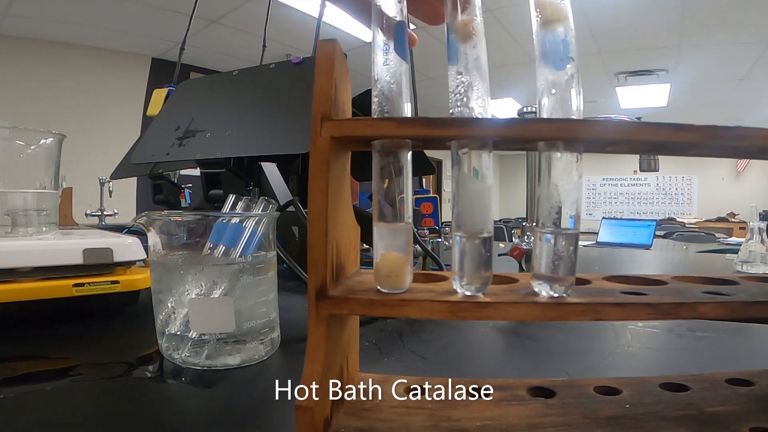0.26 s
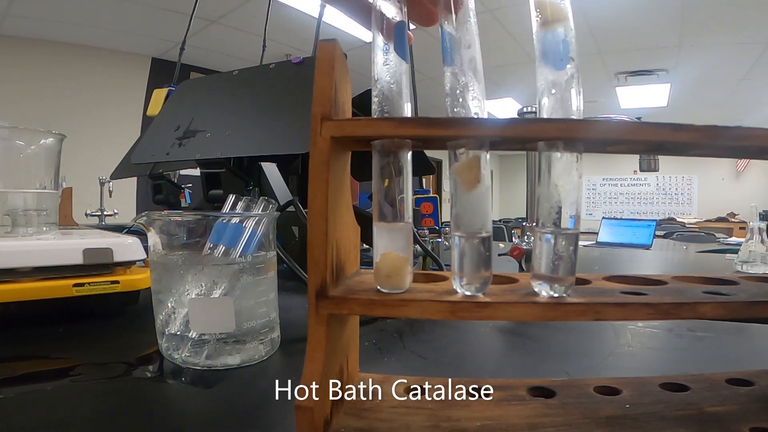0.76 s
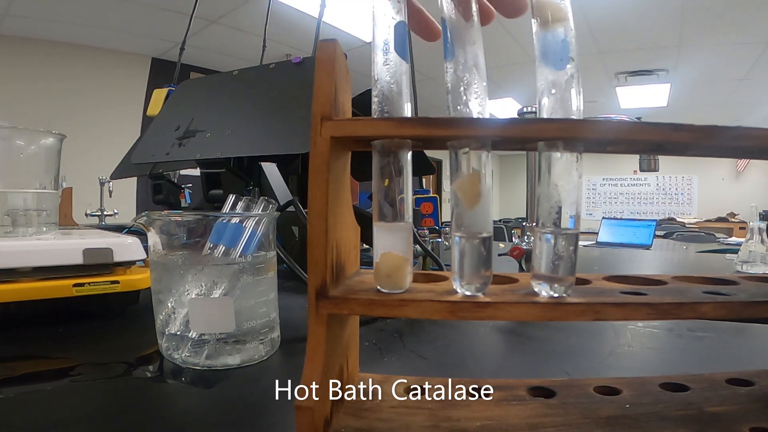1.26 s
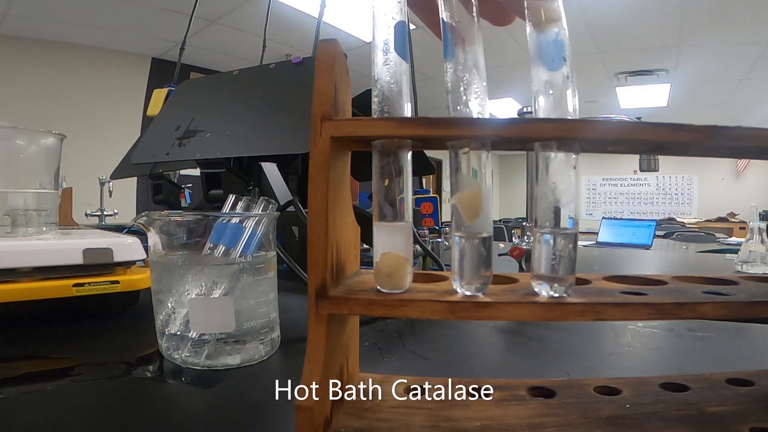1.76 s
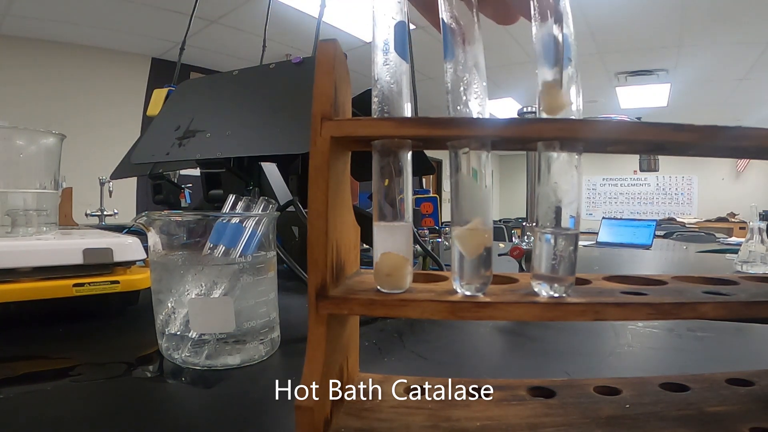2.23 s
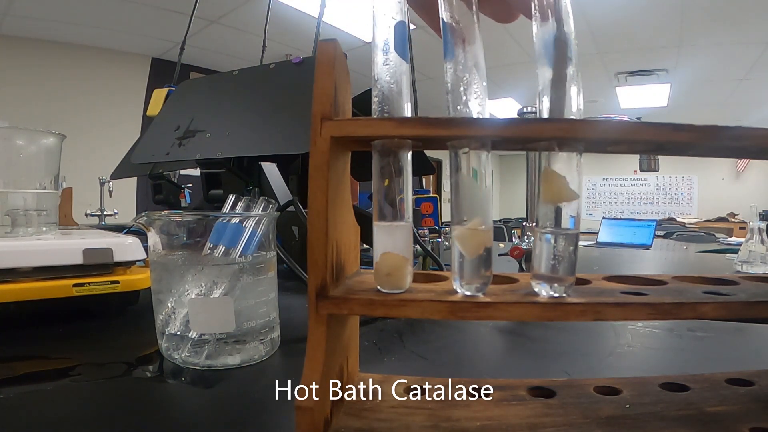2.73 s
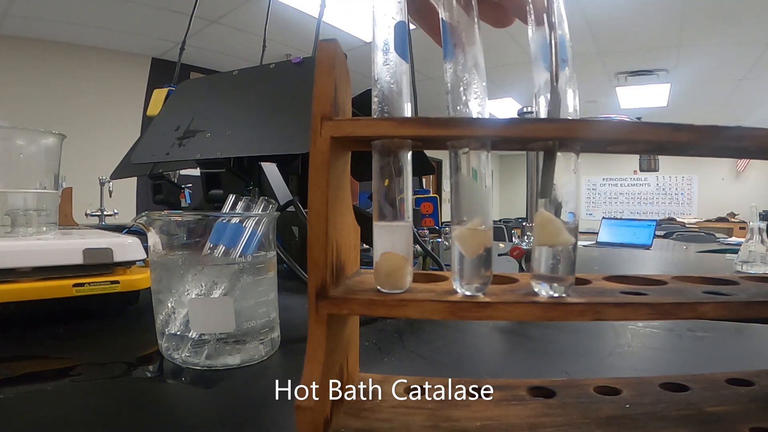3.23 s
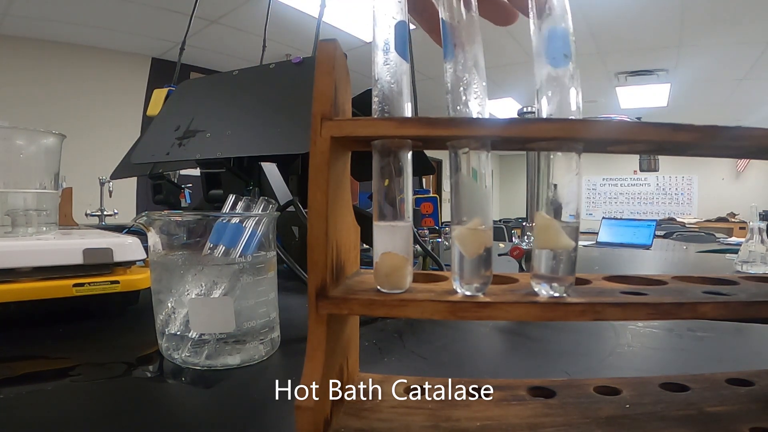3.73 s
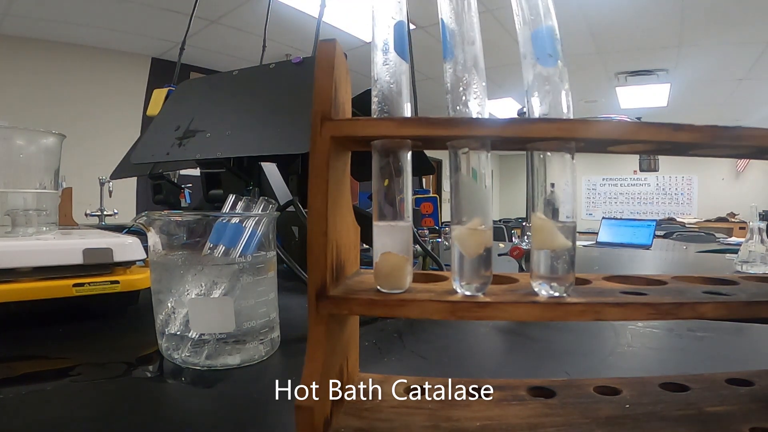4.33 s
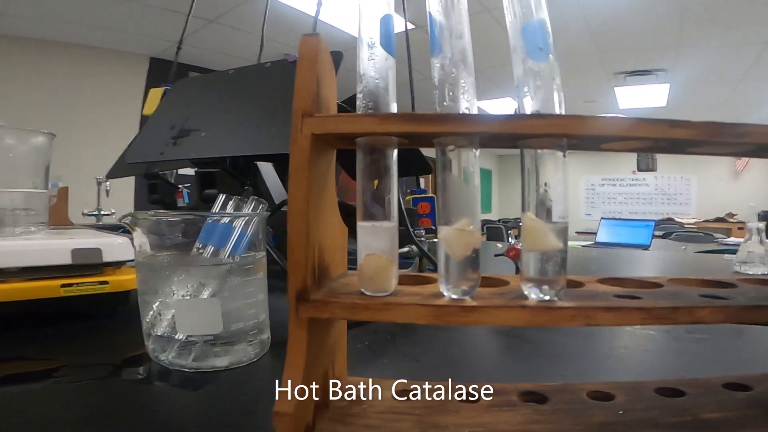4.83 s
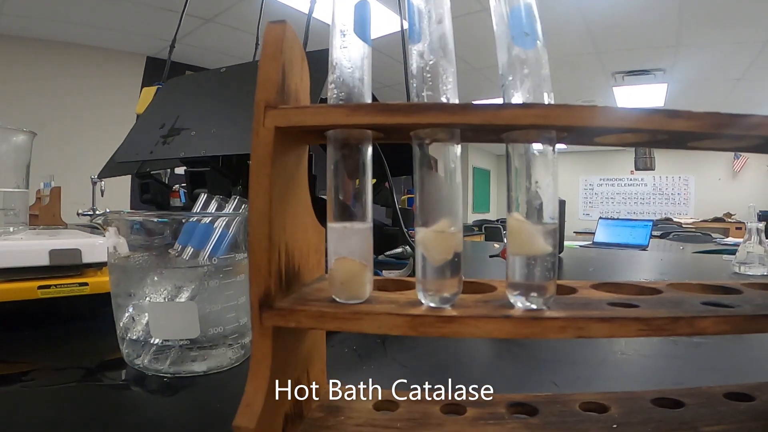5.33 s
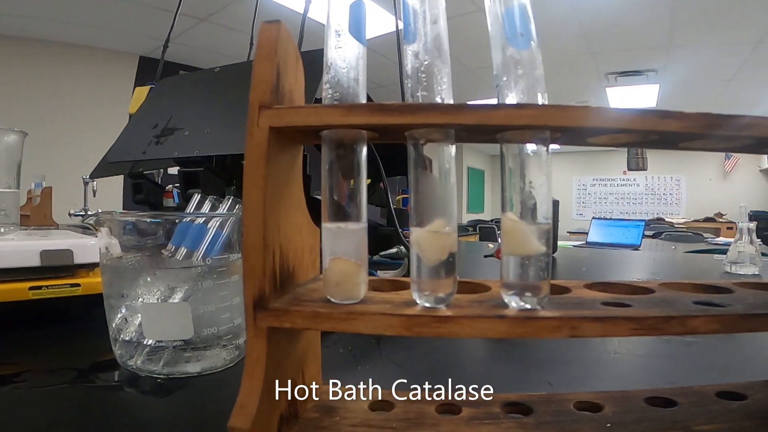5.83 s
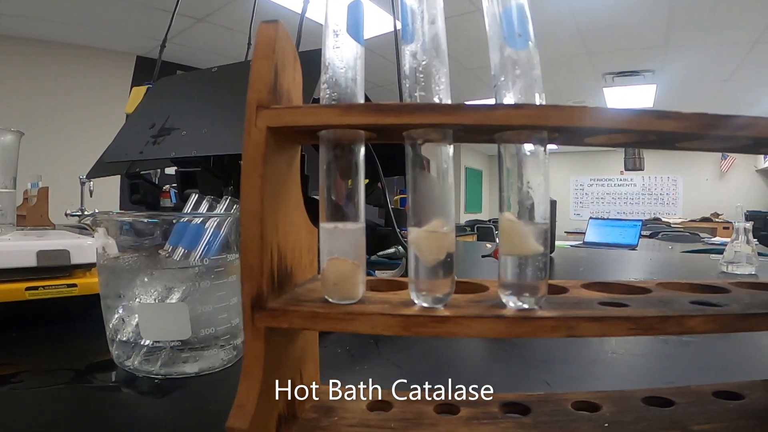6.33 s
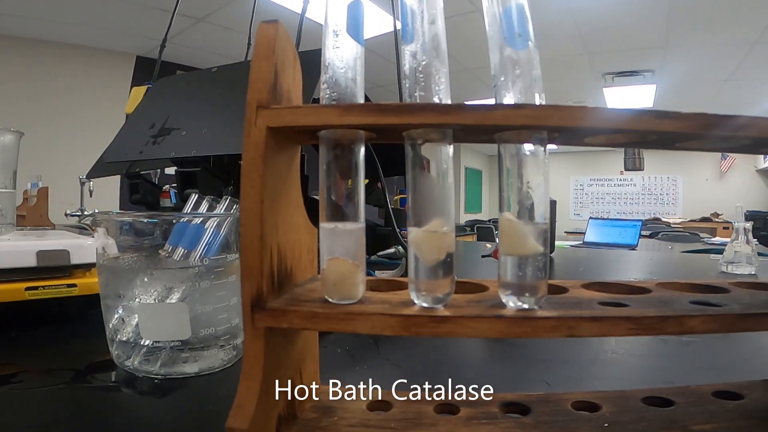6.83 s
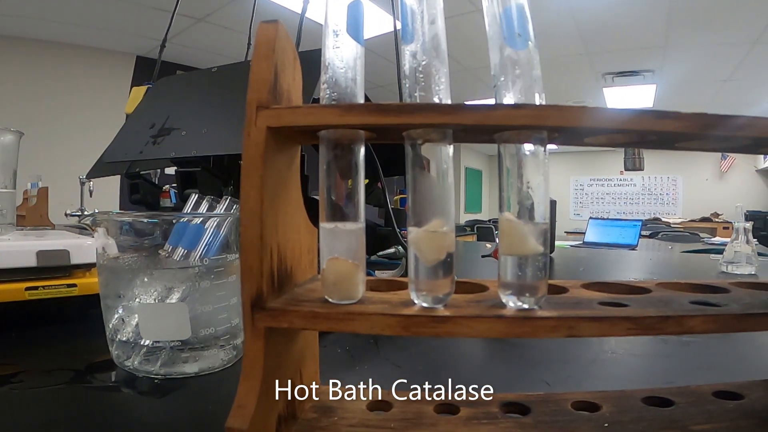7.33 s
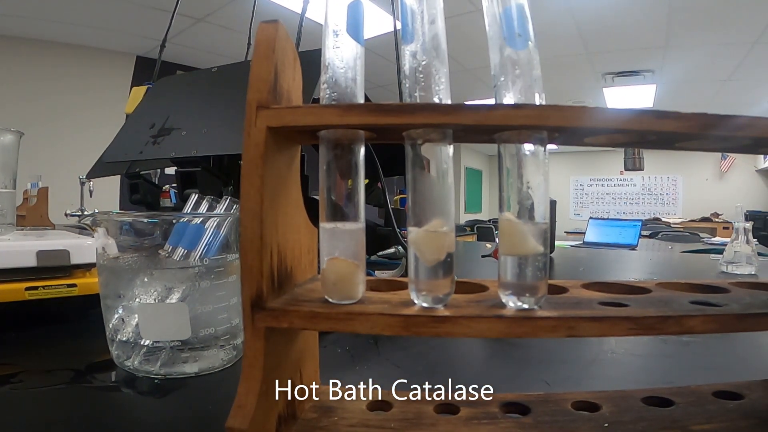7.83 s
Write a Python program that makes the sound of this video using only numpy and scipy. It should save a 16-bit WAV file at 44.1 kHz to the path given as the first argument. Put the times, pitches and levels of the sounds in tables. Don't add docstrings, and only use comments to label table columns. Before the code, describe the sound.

A rod taps and rubs glass test tubes, pushing soft lumps down in bursts of bright clinks, then the camera knocks and scrapes along the bench.

```python
import sys
import numpy as np
from scipy import signal
from scipy.fft import rfft, irfft
from scipy.io import wavfile

SR = 44100
rng = np.random.default_rng(int(sys.argv[2]) if len(sys.argv) > 2 else 0)


def nominal_scale(level):
    x = np.asarray(level, float) / 20
    return 10 ** x


def wav_record(signal):
    frames = np.transpose(np.atleast_2d(signal))
    bounded = np.clip(frames, -1, 1)
    quanta = np.round(bounded * 32767).astype(np.int16)
    wavfile.write(sys.argv[1], SR, quanta)


N = 356328

# pitch in Hz, level in dB.
WALL_MODES = [(1400, -16.5), (1700, -14.5), (2150, -9), (2330, -12.5), (2930, -12), (3360, -7.5),
              (3720, -5.5), (4150, -1.5), (4620, 2.5), (5400, 0.5), (6100, 3.5), (6700, 2.5), (7400, 8.5),
              (8500, 9.5), (9300, 8), (10300, 6.5), (12300, 5), (13400, -6), (14600, -22)]
GLASS_HZ = [5360, 5975, 6605, 8270, 8580, 9302, 9464, 10275, 11510, 11720, 12200, 12480, 13730, 14200]
# level in dB, time to fall by 60 dB in seconds.
GLASS_RING = [(-24, .15), (-7, .28), (-13, .3), (-4, .14), (-11, .2), (-6, .23), (-15, .2), (-9, .2),
              (-15, .18), (-13, .18), (-8, .11), (-14, .15), (-17, .15), (-13, .13)]
# peak time in seconds, swell in ms per 20 dB,
# fade in ms per 20 dB, rasp level in dB, brightness in dB.
SLIDE_STROKES = [(4.976, 30.5, 39, -33.5, 0.5), (5.0, 27, 24, -37, 3), (5.028, 19, 15, -36, -5),
                 (5.06, 42, 72, -40.5, 2), (5.13, 92, 94, -37.5, 1), (5.195, 101, 57, -41, -3),
                 (5.228, 42, 15, -44.5, -2), (5.7, 46, 54, -49.5, 4), (5.77, 98, 65, -63, 14),
                 (5.9, 150, 150, -66.5, 3), (6.045, 40, 45, -52.5, 8.5), (6.2, 113, 73, -59, 9),
                 (6.392, 13, 58, -47.5, 9), (6.455, 56.5, 127, -43, 4), (6.77, 61, 57, -52, 4),
                 (6.9, 176, 233, -66.5, 11)]
LET_GO_S = 5.6


def rms_one(x):
    return x / np.sqrt(np.mean(x ** 2) + 1e-20)


def in_time(rows):
    s, *columns = np.transpose(rows)
    return [np.interp(np.arange(N) / SR, s, c) for c in columns]


def at_hz(points, hz):
    curve_hz, value = np.transpose(points)
    return np.interp(np.log(hz), np.log(curve_hz), value)


def drift(rate):
    r = np.exp(-80 * np.pi * rate / SR)
    slow = signal.lfilter([1], [1, -2 * r, r * r], rng.standard_normal(N // 40 + 2002))[2000:]
    return np.interp(np.arange(N) / 40, np.arange(len(slow)), rms_one(slow))


def shaped(noise, gain_db):
    hz = np.fft.rfftfreq(noise.shape[-1], 1 / SR).clip(5)
    return irfft(rfft(noise) * nominal_scale(gain_db(hz)), noise.shape[-1])


def filtered(x, order, hz, kind="low"):
    return signal.sosfilt(signal.butter(order, hz, kind, fs=SR, output="sos"), x)


def modes(hz, db, t60, seconds):
    t = np.arange(int(seconds * SR))[:, None] / SR
    sines = np.sin(2 * np.pi * hz * t) * np.tanh(2 * hz * t)
    return (nominal_scale(db - 60 * t / t60) * sines).sum(axis=1)


def add(out, sound, s, peak_db):
    i = round(s * SR)
    out[i:i + len(sound)] += (nominal_scale(peak_db) * sound / np.abs(sound).max())[:N - i]


def slips(per_s, spread_db):
    size = nominal_scale(spread_db * np.minimum(rng.exponential(1, N), 5)) * rng.choice([-1, 1], N)
    return size * (rng.random(N) < per_s / SR)


def strokes(rows):
    t = np.arange(0, N / SR + .002, .001)[:, None]
    s, swell, fade, db, *columns = np.transpose(rows)
    away = 1000 * np.maximum((s - t) / swell, (t - s) / fade)
    power = nominal_scale(2 * (db - 20 * away ** 1.61)) + 1e-14
    total = power.sum(axis=1)
    led = [power @ c / total for c in columns]
    return in_time(np.transpose([t[:, 0], 10 * np.log10(total), *led]))


def air(gain_db):
    # pitch in Hz, likeness of left and right from 0 to 1.
    likeness = [(60, 1), (180, 1), (550, 0.89), (1000, 0.42), (2000, 0.36), (4200, 0.24), (7000, 0.17),
                (15000, 0.1)]
    # pitch in Hz, left minus right in dB.
    air_lean = [(60, 1), (240, 0), (950, 5), (3770, 7), (15000, -0.5)]

    def side_db(hz):
        alike = at_hz(likeness, hz)
        return gain_db(hz) + 10 * np.log10((1.01 - alike.clip(0, 1)) / (1 + alike))

    mid, side = rng.standard_normal((2, N))
    mid, side = shaped(mid, gain_db), shaped(side, side_db)
    left = shaped(mid + side, lambda hz: at_hz(air_lean, hz) / 2)
    right = shaped(mid - side, lambda hz: -at_hz(air_lean, hz) / 2)
    return np.array([np.roll(left, 2), right]) / mid.std()


def ventilation():
    # pitch in Hz, dB per Hz.
    hum = [(12, -33), (20, -4.5), (81, -4.5), (112, 2.5), (129, 3), (146, -5.5), (195, -4.5), (286, -8),
           (346, -10), (419, -18), (476, -14), (900, -36.5), (1170, -78)]
    # time in seconds, gain in dB.
    hum_gain = [(0, -0.5), (.8, 1), (1.2, -2), (1.45, 0.5), (2.2, 0.5), (3.0, 0.5), (3.42, -2.5), (3.68, 3),
                (4.1, 0.), (5.6, -1), (6.2, 1.5), (7.0, 0.5), (8.08, 1.5)]
    # pitch in Hz, width in Hz, level in dB.
    duct = [(59, 8.7, -68.5), (115.3, 27, -55.5), (206.6, 6.6, -53.5), (240.4, 8.2, -55), (488.6, 12, -69)]
    # pitch in Hz, dB per Hz.
    hiss = [(530, -58), (900, -9.5), (1190, -0.5), (1300, -4), (1600, -2), (2960, -11.5), (3480, -8.5),
            (4210, -19), (5020, -16), (6130, -23.5), (8330, -24), (15000, -57)]
    # time in seconds, gain in dB.
    hiss_gain = [(0, 2.5), (4.0, 3.5), (4.4, 5.5), (5.4, 0.5), (8.08, 2)]
    hum_db = -41.5 + in_time(hum_gain)[0] + 0.32 * drift(4.6)
    out = nominal_scale(hum_db) * air(lambda hz: at_hz(hum, hz))
    for hz, width, db in duct:
        out += nominal_scale(db) * air(lambda f: -20 * np.log10(1 + ((f - hz) / width * 2) ** 2))
    hiss_db = -65.5 + in_time(hiss_gain)[0] + .5 * drift(2.1)
    return out + nominal_scale(hiss_db) * air(lambda hz: at_hz(hiss, hz))


def whirr():
    # time in seconds, chirps per second.
    chirp_pace = [(0.0, 17), (8.08, 15)]
    turns = np.cumsum(in_time(chirp_pace)[0]) / SR + 0.088
    gate = np.maximum(np.cos(2 * np.pi * turns), 0) ** 2.7
    tone = shaped(rng.standard_normal(N), lambda hz: -20 * np.log10(1 + ((hz - 8050) / 150) ** 2))
    return nominal_scale(-81.5) * gate * rms_one(tone)


def taps():
    # start in seconds, peak
    # in dB, strongest ring in Hz, wood heard through the glass in dB, treble (hardness) in dB.
    near_taps = [(0.2195, -36.5, 2480, -18, 13), (0.2957, -11, 4530, -8, -5.5),
                 (0.385, -15.5, 4900, -9.5, -2.5), (0.4998, -39, 4500, -19, -18),
                 (0.5487, -26.5, 3450, 4, -10), (0.6453, -16.5, 4560, -12, 5), (0.6872, -20, 4600, -3, 7),
                 (0.7105, -30.5, 2900, 13, -1), (0.7336, -12, 2400, -4, -15), (0.7441, -7.5, 4800, -24, -4),
                 (0.7955, -21, 3550, 11, -3), (0.829, -29, 3830, -17, 4), (0.92, -22, 2900, 3, -2),
                 (0.9405, -29, 3940, -13, -2), (0.9633, -18, 3880, -30, -8), (0.9755, -20, 4330, -19.5, -5),
                 (0.987, -24.5, 4000, -24, -7), (0.992, -32, 3590, -16, -3), (1.003, -28, 3920, -18, -5),
                 (1.0266, -32.5, 3620, -26, 2), (1.5035, -48, 4200, -25, -7), (1.983, -44, 4200, -23, -8),
                 (2.0805, -32, 3730, -6, -17), (2.099, -15, 4420, -41, -7), (2.137, -24.5, 4440, -27, -17),
                 (2.1444, -30, 3080, -30, -10), (2.1657, -12.5, 4030, -21, -3)]
    next_taps = [(2.268, -11, 4420, -13, -15.5), (2.2928, -10, 4130, -22, -4), (2.386, -19, 3380, -3, -4.5),
                 (2.522, -39.5, 2870, 16, 2), (2.578, -40, 2800, 13, -9), (2.722, -44, 3000, -1, -11),
                 (2.749, -41, 4700, 11, -4), (2.77, -33, 3350, 4, -14), (2.795, -47, 4200, -10, 0),
                 (2.801, -39, 2960, -3, -3), (2.819, -47, 4730, -1, -5), (2.876, -42, 3330, -5, -3),
                 (2.899, -26.5, 4630, -15, 4), (2.9183, -32, 3000, -10.5, -10), (2.937, -33, 4600, -1, -16),
                 (2.9568, -13.5, 3340, -17, 1), (2.972, -23, 3420, -28, 3), (3.184, -14.5, 4640, -10, -7),
                 (3.199, -19.5, 4640, -21, -5), (3.2507, -11, 4520, -3.5, -16), (3.279, -24.5, 2900, -7, 0),
                 (3.321, -35.5, 1960, 21, 0), (3.551, -21, 3320, 1, -11), (3.5685, -15, 3080, 4, 3),
                 (3.8417, -19.5, 4130, -3, -4), (3.727, -49, 2900, 3, -7), (3.744, -39, 2880, -2, -3),
                 (3.7512, -31, 2920, 6, -6), (3.8716, -16, 4930, -19, 4), (3.922, -30.5, 1470, 10.5, -4),
                 (3.932, -27, 3580, 9, -5), (3.943, -22, 3520, -12, -6), (3.979, -14, 4130, -26, 8)]
    settling_ticks = [(4.6107, -42, 1630, -3, -9), (4.6939, -24, 1580, 4, 12), (4.728, -46, 5030, -15, 2),
                      (4.815, -42, 1630, 9, -10), (5.6, -48, 1730, -4, 2), (6.504, -43, 4460, -10, -4),
                      (6.5201, -34, 2330, -3, 10), (6.5335, -40, 2300, 1, 8), (6.5927, -43, 2500, 13, -4),
                      (6.7363, -50, 1940, -7, 0), (6.775, -45, 2580, -21, 0), (7.794, -48, 7440, -27, 3),
                      (8.015, -40, 6800, -20, 8)]
    # start in seconds, peak in dB, pitch in Hz,
    # time to fall by 60 dB in seconds.
    lone_rings = [
        (3.8409, -22, 4130, 0.022),
        (3.978, -17, 3980, 0.061),
        (3.991, -26, 3965, 0.045),
        (4.6095, -37.5, 1580, 0.018),
        (4.728, -40, 5140, 0.018),
    ]
    wall_hz, wall_db = np.repeat(np.transpose(WALL_MODES), 3, axis=1)
    out = np.zeros(N)
    rows = near_taps + next_taps + settling_ticks
    bounce = np.zeros(130)
    bounce[[0, 58, 127]] = 1, .6, -.3
    for (s, db, hz, low_db, treble_db), luck in zip(rows, rng.standard_normal((len(rows), 3, len(wall_hz)))):
        softer_db = -15 - db
        high_db = -18 + treble_db - 0.061 * softer_db - 0.2 * max(low_db + 8.5, 0)
        pitch = wall_hz * (1 + .034 * luck[0])
        tilt_db = np.interp(pitch, [2400, 2900, 5460, 7930], [low_db + 4.5, 0, 0, high_db + 3])
        t60 = 0.048 * nominal_scale(0.089 * softer_db)
        damped = 0.23 * np.sqrt(t60) * (4000 / pitch) ** .5 * nominal_scale(2 * luck[2])
        ring = modes(pitch, wall_db + tilt_db + 4 * luck[1], damped, .12)
        ring += modes(pitch, wall_db + .6 * tilt_db + 13, .16 * damped, .12)
        ring += modes(hz * np.array([.994, 1.009]), 12, t60 * .85, .12)
        add(out, np.convolve(ring, bounce), s, db)
    for s, db, hz, t60 in lone_rings:
        add(out, modes(hz * np.array([.997, 1.006]), np.array([0, -6]), t60, .12), s, db)
    return filtered(out, 2, 1100, "high")


def rubs():
    # peak time in seconds, swell in ms
    # per 20 dB, fade in ms per 20 dB, peak in dB, singing pitch in Hz.
    rub_strokes = [(.226, 6, 32, -64, 2400), (.31, 7, 100, -61, 4500), (.395, 2, 39, -52.5, 5070),
                   (.558, 5, 53, -55, 2900), (.655, 13, 20, -51, 4200), (.76, 21, 22, -53, 4560),
                   (.805, 24, 17, -45.5, 3530), (.952, 3, 20, -51, 3800), (.98, 20, 26, -49.5, 4080),
                   (1.006, 18, 25, -56, 4000), (1.032, 26, 22, -55.5, 3420), (2.138, 13, 17, -49, 4420),
                   (2.31, 23, 88, -52, 3080), (2.44, 86, 129, -58, 3440), (2.57, 113, 56, -58.5, 2900),
                   (2.735, 33, 42, -57, 2900), (2.782, 39, 60, -47.5, 2090), (2.885, 26, 35, -53, 2230),
                   (2.932, 34, 46, -48, 4600), (2.975, 26, 24, -50.5, 3230), (3.2, 22, 41, -49, 4600),
                   (3.285, 24, 25.5, -43.5, 2980), (3.33, 26, 41, -55.5, 2010), (3.642, 39, 39, -53, 2900),
                   (3.755, 30, 49, -44, 2800), (3.787, 37, 20, -39.5, 4200), (3.86, 26, 38, -45.5, 2740),
                   (3.89, 30, 24, -44.5, 2760), (3.945, 27, 41, -39, 3650), (3.992, 27, 18, -44, 4100),
                   (4.42, 216, 145.5, -67, 1830), (4.705, 11, 37.5, -57.5, 1500),
                   (4.79, 76, 76, -62.5, 5800)]
    # pitch in Hz, width in Hz, level in dB.
    rubbed_tubes = [
        [(1880, 48, -9.5), (3590, 100, -12.5), (4130, 55, -12), (4950, 180, -13), (6130, 26, -19)],
        [(1730, 84, -4), (2045, 69, -1.5), (2980, 180, -5), (3330, 56, 1.5), (4200, 640, 5.5), (5680, 70, -2.5)],
    ]
    level_db, song_hz = strokes(rub_strokes)
    on_next = np.arange(N) > 2.25 * SR
    bright_db = np.where(on_next, -5.5, 7.5) + 0.88 * (level_db + 47.5)
    grains = nominal_scale(level_db + 2.8 * drift(60)) * rms_one(slips(per_s=4000., spread_db=3.2))
    place = np.digitize(drift(12), [-.43, .43]) + 3 * on_next
    wall_hz, wall_db = np.transpose([mode for mode in WALL_MODES if mode[0] > 6400])
    out = 0
    for k, luck in enumerate(rng.standard_normal((6, 2, len(wall_hz)))):
        hz, width, db = np.transpose(rubbed_tubes[k // 3])
        width = (1.5 * width).clip(130, 900)
        pitch = hz * (1 + .015 * luck[0, :len(hz)])
        low = modes(pitch, db + 10 * np.log10(width), np.log(1000) / np.pi / width, .06)
        wood_hz = np.geomspace(1000, 6200, 9) * (1 + 0.048 * luck[1, :1])
        low += modes(wood_hz, db.max() + 17.0, 0.003, .06)
        high = modes(wall_hz * (1 + .04 * luck[0]), wall_db + 3 * luck[1], .01, .06)
        for body, gain_db in ((low, 0), (high, bright_db - 4.5)):
            here = grains * (place == k) * nominal_scale(gain_db)
            out += signal.oaconvolve(here, body / np.linalg.norm(body))
    song_width_hz = 110
    turn = np.exp(2j * np.pi * np.cumsum(song_hz) / SR)
    song = filtered(grains / turn, 1, song_width_hz / 2) * turn
    return out[:N] + nominal_scale(-0.5) * np.sqrt(SR / song_width_hz) * song.real


def clinks():
    # start in seconds, peak in dB, favoured ring in Hz.
    touches = [(0.743, -20.5, 12480), (3.187, -22, 8270), (3.872, -34, 12480), (3.979, -29, 6605),
               (4.695, -38.5, 10275), (5.543, -54, 6605), (5.64, -59, 5975), (5.687, -53, 9302),
               (5.703, -46, 5975), (5.7005, -40, 14200), (5.702, -35.5, 12200), (5.703, -27, 8270),
               (5.706, -36, 9302), (5.719, -39, 8270), (5.728, -44, 10275), (5.8, -60, 12200),
               (5.876, -65, 5975), (5.951, -56, 5975), (6.024, -53, 6605), (6.044, -58, 5975),
               (6.371, -53, 6605), (6.386, -39, 10275), (6.387, -38, 8270), (6.389, -46.5, 5975),
               (6.393, -39, 6605), (6.411, -47, 8270), (6.43, -39, 6605), (6.431, -39, 10275),
               (6.448, -48, 11510), (6.447, -37.5, 5360), (6.459, -46, 5975), (6.455, -38, 10275),
               (6.457, -44, 8580), (6.488, -49, 6605), (6.518, -54, 8580), (6.546, -49, 8580)]
    out, hz, (mode_db, t60) = np.zeros(N), np.array(GLASS_HZ), np.transpose(GLASS_RING)
    for (s, db, favoured), luck in zip(touches, rng.standard_normal((len(touches), 1300))):
        distance = np.abs(hz - favoured)
        struck_db = np.where(distance == distance.min(), 3, mode_db - 5 + 3 * luck[:len(hz)])
        chatter = luck ** 3 * nominal_scale(-32 - 24 * np.arange(len(luck)) / len(luck))
        chatter[0] = 1
        lasts = t60 * (0.78 if s > LET_GO_S else .1)
        ring = modes(hz, struck_db, lasts, .4)
        ring += modes(hz + 45 * luck[-len(hz):], struck_db - 15, lasts, .4)
        add(out, signal.oaconvolve(ring, chatter), s, db)
    return out


def pops():
    # start in seconds, peak in dB, length of the push in seconds, upper modes in dB.
    jerks = [
        (1.4824, -17, 0.0035, 7.5),
        (1.8216, -23, 0.0034, -3),
        (1.962, -17, 0.0053, 1.5),
    ]
    # pitch in Hz, level in dB, time to fall by 60 dB in seconds.
    column = [(550, -9, 0.025), (1060, -33, 0.046), (1646, -7, 0.015), (2174, -12.5, 0.019),
              (2520, -17, 0.02), (3080, -24.5, 0.034), (3830, -12, 0.0076), (4200, -1, 0.0087),
              (4970, -1.5, 0.002), (5870, -21.5, 0.016), (9000, -30, 0.016), (9900, -21, 0.013),
              (12200, -39, 0.017)]
    out = np.zeros(N)
    hz, mode_db, t60 = np.transpose(column)
    t = np.arange(400) / SR
    for (s, db, push, upper_db), luck in zip(jerks, rng.standard_normal((len(jerks), 400))):
        drive = np.cos(2 * np.pi * np.outer(t, hz[2:4])).sum(axis=1) + 2.0 * luck
        drive = drive * (t < push) + 20.0 * (t == 0)
        body = modes(hz, mode_db + upper_db * (hz > 2800), t60, .1)
        add(out, np.convolve(body, drive), s, db)
    return out


def slides():
    # peak time in seconds, swell in ms per 20 dB,
    # fade in ms per 20 dB, rumble in dB.
    shakes = [
        (4.97, 37, 104, -26.5),
        (5.035, 30, 51, -25.5),
        (5.19, 295, 133, -36),
        (6.46, 91, 140, -39),
        (3.55, 36, 38, -43),
        (3.68, 80, 90, -45.5),
    ]
    # pitch in Hz, dB per Hz.
    rasp_colour = [(180, -31), (300, -21), (509, -18), (968, -2.5), (2250, -8), (2880, -14), (8560, -25),
                   (9290, -28), (12700, -39.5), (15500, -44)]
    # pitch in Hz, width in Hz, height in dB.
    bench = [(680, 110, 9), (1025, 160, 1.5), (1910, 150, 4.5), (2900, 300, 9), (3380, 170, 8),
             (4440, 220, 3.5), (5750, 290, 3.5), (9350, 250, -11)]

    def colour(hz):
        humps = sum(db / (1 + ((hz - top_hz) / width * 2) ** 2) for top_hz, width, db in bench)
        return at_hz(rasp_colour, hz) + humps

    rasp_db, bright_db = strokes(SLIDE_STROKES)
    rumble_db, = strokes(shakes)
    mid, side = (rms_one(shaped(slips(per_s=9000., spread_db=0.5), colour)) for _ in range(2))
    rasp = mid + .9 * side * [[1], [-1]]
    top = filtered(rasp, 2, 4500, "high")
    brightened = rasp + (nominal_scale(bright_db + 1.0 * drift(50)) - 1) * top
    rasp = nominal_scale(rasp_db - 1.5 + 1.2 * drift(70)) * brightened
    rumble = filtered(rng.standard_normal((2, N)), 1, [35, 90], "band")
    rumble = filtered(rumble, 2, 320)
    return rasp + nominal_scale(rumble_db + 4) * rms_one(rumble[0] + .55 * rumble[1] * [[1], [-1]])


def knocks():
    # start in seconds, peak in dB, ring in Hz.
    base_knocks = [(4.959, -37, 686), (4.975, -16.5, 1060), (5.006, -29, 970), (5.018, -29, 1910),
                   (5.026, -14, 705), (5.066, -35, 890), (5.09, -27, 2900), (5.121, -32, 1090),
                   (5.158, -37, 1200), (5.67, -37, 2150), (5.683, -38, 3400), (5.69, -43, 2100),
                   (6.023, -37.5, 2260), (6.042, -36, 3420), (6.387, -29, 3410), (6.404, -28.5, 2160),
                   (6.414, -28, 2340), (6.431, -22, 3350), (6.438, -19.5, 2240), (6.448, -22, 2210),
                   (6.456, -20.5, 2200), (6.469, -22.5, 826), (6.482, -29, 2260), (6.504, -36, 850),
                   (6.532, -31, 1670)]
    # pitch in Hz, level in dB.
    wood = [(650, 12.5), (850, 7.5), (1150, 6), (1550, -7), (1950, 12), (2250, -3), (2500, 10), (2900, -6),
            (3400, 6), (3800, -6), (4800, -19)]
    # start in seconds, peak in dB, pitch in Hz,
    # time to fall by 60 dB in seconds.
    thuds = [
        (4.976, -19.5, 193, .1),
        (5.034, -28, 900, 0.051),
        (5.042, -26, 746, 0.034),
        (6.512, -30.5, 328, 0.02),
    ]
    out, (wood_hz, wood_db) = np.zeros(N), np.transpose(wood)
    for (s, db, hz), luck in zip(base_knocks, rng.standard_normal((len(base_knocks), 2, len(wood)))):
        t60 = 0.043 * (1000 / hz) ** 0.25
        body = modes(wood_hz * (1 + 0.056 * luck[0]), wood_db + 4 * luck[1], 0.48 * t60, .1)
        add(out, body + modes(np.array([hz]), 10.5, t60, .1), s, db - 5.5)
    for s, db, hz, t60 in thuds:
        add(out, modes(np.array([hz]), 0, t60, .1), s, db)
    return out


def jingle():
    rasp_db, bright_db = strokes(SLIDE_STROKES)
    mode_db, t60 = np.transpose(GLASS_RING)
    i = np.arange(N)
    touches = slips(per_s=160.0, spread_db=5.5) * (i > LET_GO_S * SR) * (i < 6.62 * SR)
    ring = modes(np.array(GLASS_HZ), .5 * mode_db, .2 * t60, .2)
    shaken = nominal_scale(rasp_db - 21 + 0.34 * bright_db) * rms_one(touches)
    return signal.oaconvolve(shaken, ring / np.linalg.norm(ring))[:N]


def ports(x):
    # pitch in Hz, gain in dB.
    shade = [(8000, -1), (10000, -5), (12000, -10)]
    t = np.arange(1500) / SR
    scatter = np.diff(rng.standard_normal(1501)) * nominal_scale(-30 - 60 * t / .016)
    apart = signal.oaconvolve(x, scatter)[:N]
    left = shaped(signal.lfilter([0, 0, .6], [1, -.4], x), lambda hz: at_hz(shade, hz))
    return np.array([nominal_scale(3.3) * left + .6 * apart, nominal_scale(3.) * x - apart])


def room(x):
    t = np.arange(SR // 2) / SR
    noise = rng.standard_normal((2, 2, len(t))) * (t > .004)
    dull = signal.lfilter([.3], [1, -.8], noise[0])
    tail = dull * nominal_scale(-60 * t / 0.36) + 0.85 * noise[1] * nominal_scale(-60 * t / 0.3)
    return nominal_scale(-49.5) * signal.oaconvolve(x[None], tail, axes=1)[:, :N]


def housing(pair):
    # pitch in Hz, left minus right in dB.
    bench_lean = [(60, 2), (250, -5), (500, -1), (1000, -10), (2000, 0.5), (4000, 3), (7000, -1.5),
                  (11000, -10)]
    left = shaped(pair[0], lambda hz: at_hz(bench_lean, hz) / 2)
    right = shaped(pair[1], lambda hz: -at_hz(bench_lean, hz) / 2)
    return np.array([np.roll(left, 2), right])


def scene():
    rack = taps() + pops() + clinks() + rubs() + jingle()
    return ports(rack) + room(rack) + housing(knocks() + slides()) + ventilation() + whirr()


def top_cut(x):
    return signal.sosfilt(signal.butter(12, 16660, fs=SR, output="sos"), x)


def record(dry):
    # time in seconds, share of the side signal kept.
    stereo_width = [(0, 0.82), (4.9, 0.95), (5.25, 0.85), (5.5, 0.05), (6.3, .02), (8.08, 0.14)]
    mid = (dry[0] + dry[1]) / 2
    side = (dry[0] - dry[1]) / 2 * in_time(stereo_width)[0]
    both = filtered([mid + side, mid - side], 8, 14300)
    return top_cut(both)


dry = scene()
out = record(dry)
wav_record(out)
```